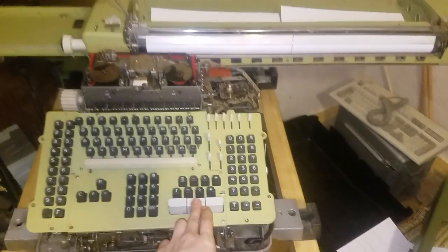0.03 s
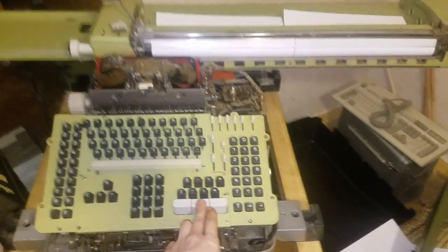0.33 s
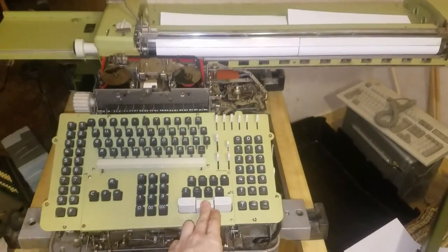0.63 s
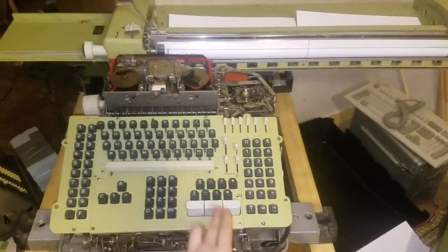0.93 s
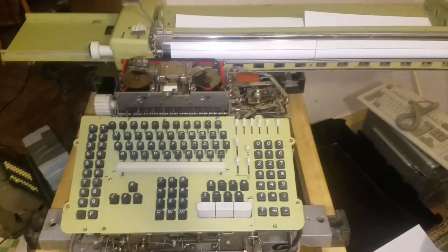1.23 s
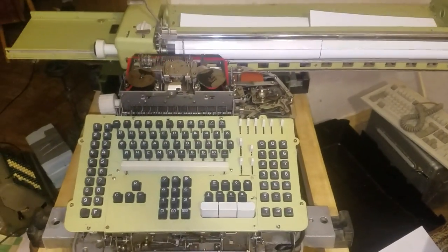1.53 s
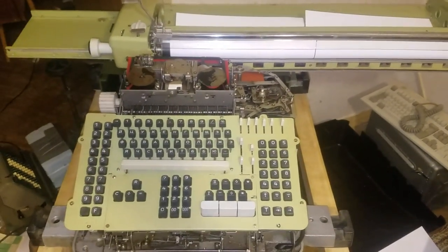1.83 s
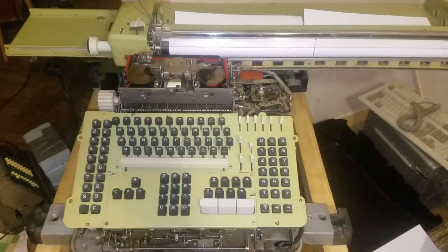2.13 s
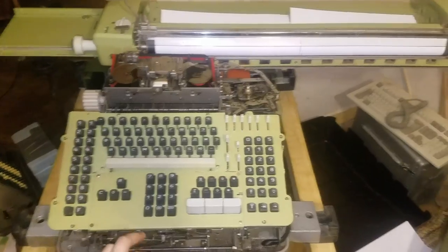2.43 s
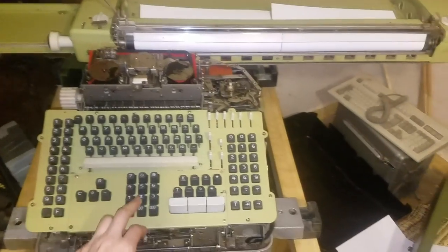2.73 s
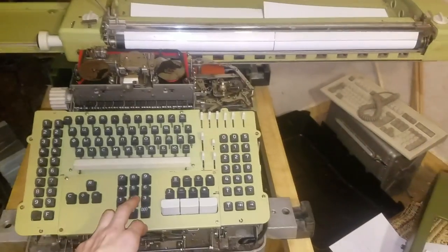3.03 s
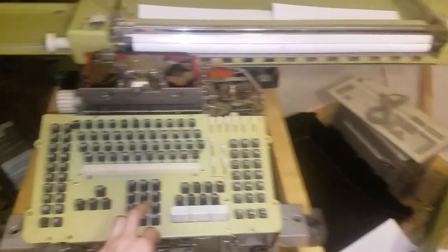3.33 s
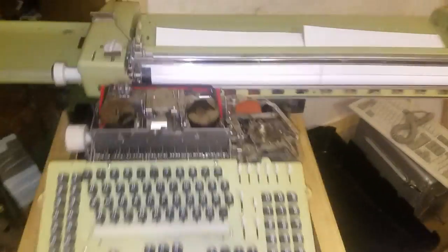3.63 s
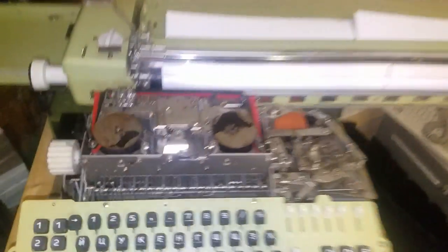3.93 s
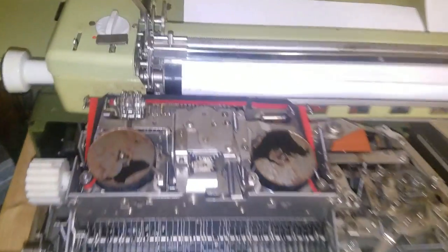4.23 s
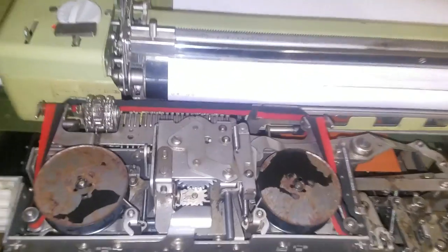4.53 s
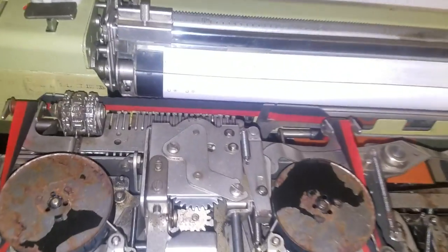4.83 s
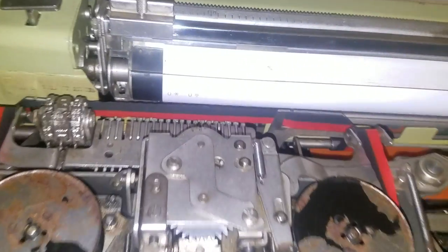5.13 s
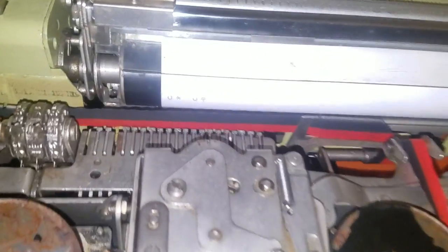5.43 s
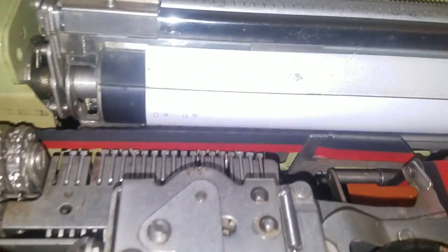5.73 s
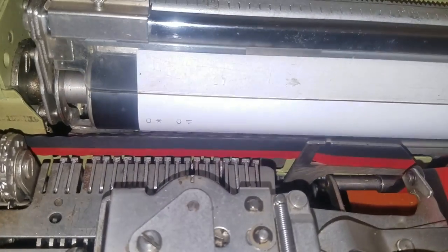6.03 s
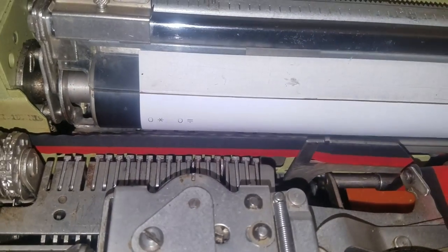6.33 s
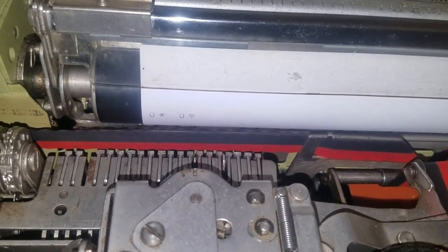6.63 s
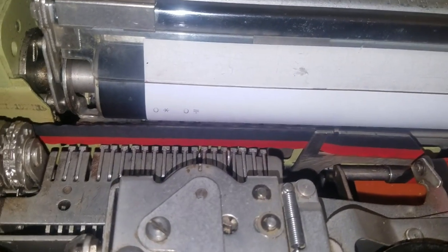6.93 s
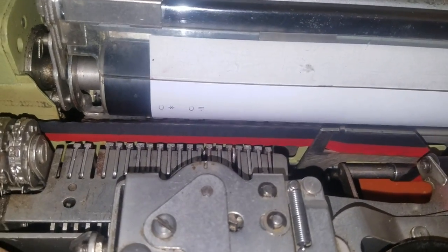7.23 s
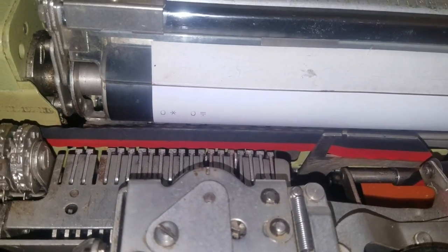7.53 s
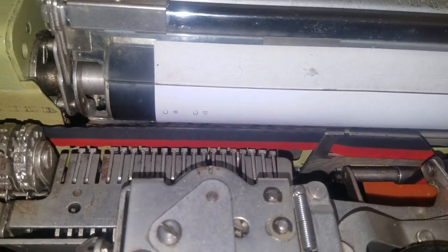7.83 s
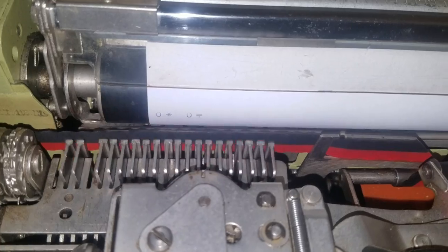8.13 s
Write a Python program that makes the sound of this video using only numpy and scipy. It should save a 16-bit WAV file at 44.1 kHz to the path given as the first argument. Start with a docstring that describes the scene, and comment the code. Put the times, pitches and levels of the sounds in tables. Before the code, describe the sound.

An old mechanical calculating machine clatters through a cycle, whirs down with slowing ticks, then keys click and it starts clattering again.

```python
"""Motor-driven accounting machine

An old machine is heard from close above in a small, quiet room. A key trips the clutch: racks, levers
and type bars collide through a cycle of strokes, ringing as steel and exciting the modes of the frame.
Friction then brings the drive to rest, its whine falling and a pawl ticking ever slower.
A few keys click, and a new cycle begins."""
import sys
import numpy as np
from scipy import signal
from scipy.fft import rfft, irfft, next_fast_len
from scipy.io import wavfile

SR = 44100
rng = np.random.default_rng(int(sys.argv[2]) if len(sys.argv) > 2 else 0)


def inscribe(sig):
    """Save sig as 16-bit PCM at rate SR to the path in sys.argv[1].

    A 1-D sig is mono; a 2-D sig holds one channel per row.
    Samples are clipped to [-1, 1] before scaling.
    """
    pcm = np.round(np.clip(np.atleast_2d(sig).T, -1, 1) * 32767)
    wavfile.write(sys.argv[1], SR, pcm.astype(np.int16))


N = 369116
TIME = np.arange(N) / SR

# Clutch engagements: t/s, duration/s
CYCLES = [(0.678, 1.35), (8.04, 0.4)]
# Travel of racks and levers: t/s, duration/s, relative level/dB of clatter, of springs, of frame
STROKES = [(0.673, 0.021, -24, -24, -45), (0.785, 0.065, -21.5, -27.5, -32.5),
           (0.959, 0.043, -19.5, -23, -40), (1.023, 0.018, -20.5, -23, -42.5),
           (1.052, 0.045, -21, -37.5, -43), (1.113, 0.048, -21.5, -37, -39), (1.212, 0.04, -20, -26, -38),
           (1.331, 0.14, -23, -43, -35), (1.426, 0.077, -20, -27.5, -29.5),
           (1.589, 0.2, -20.5, -25.5, -38.5), (1.839, 0.043, -21, -21, -32),
           (2.004, 0.15, -31.5, -32.5, -50.5), (2.165, 0.084, -26, -48, -33.5),
           (8.05, 0.019, -23.5, -36, -38), (8.138, 0.046, -20.5, -31, -40),
           (8.314, 0.055, -19.5, -20.5, -39.5)]
# Spectrum of struck steel: f/Hz, relative level/dB
STEEL_SPECTRUM = [(60, -23.5), (250, -11.5), (500, -1), (800, -3), (1300, -1.5), (2500, -0.5), (4000, -0.5),
                  (7000, -2), (10000, 2.5), (15500, -2.5)]
# Modes of the chassis and of the covers: f/Hz, bandwidth/Hz, relative level/dB
CHASSIS_MODES = [(50.1, 22, -20), (99.9, 22, -10.5), (131.2, 34, -5), (170, 26, -5.5), (202, 53, 4)]
COVER_MODES = [(245, 14, -4), (293, 28, -5), (321.7, 24, -0.5), (384, 45, -1), (550, 34, -12),
               (647, 120, -9.5), (807, 45, -4.5)]

# The cam shaft: full speed, deceleration, moment of rest
TOP_TURNS_PER_S, FRICTION_TURNS_PER_S2, REST_S = 4.4, 2.1135, 4.3566


def amp(db):
    """Amplitude ratio of a level in decibels."""
    return 10 ** (np.asarray(db) / 20)


def unit(x):
    """Normalisation to rms 1."""
    return x / np.sqrt(np.mean(x ** 2) + 1e-20)


def read(points, hz):
    """Interpolation along a logarithmic frequency axis."""
    f, value = np.transpose(points)
    return np.interp(np.log(hz + 1), np.log(f + 1), value)


def add(mix, s, sound):
    """Superposition of a sound on the mix at time s."""
    part = mix[:, round(s * SR):][:, :sound.shape[1]]
    part += sound[:, :part.shape[1]]


def noise(size=N):
    """White noise in two uncorrelated channels."""
    return rng.standard_normal((2, size))


def burst(start, length, db, rise_s, t60):
    """Envelope with a linear rise, a hold and an exponential decay."""
    t = TIME - start
    return np.clip(t / rise_s, 0, 1) * amp(db - 60 * np.clip((t - length) / t60, 0, 2))


def colour(x, spectrum, size=4096):
    """Minimum-phase filter of unit energy with the given spectrum."""
    log_gain = np.log(amp(read(spectrum, abs(np.fft.fftfreq(size, 1 / SR)))))
    taps = np.fft.ifft(np.exp(np.conj(signal.hilbert(log_gain)))).real[:size // 2]
    return signal.oaconvolve(x, taps[None] / np.linalg.norm(taps), axes=1)[:, :N]


def resonate(x, hz, width):
    """Response of a damped oscillator, scaled to rms 1."""
    return unit(signal.lfilter(*signal.iirpeak(min(hz, SR / 2 - 100), hz / width, fs=SR), x))


def ringing(x, hz, width, db):
    """One broad resonance stands out from a broadband excitation; unit energy per channel."""
    hit = unit(x) + amp(db) * resonate(x, hz, width)
    return hit / np.linalg.norm(hit, axis=1, keepdims=True)


def impact(hz, t60, width, ring_db, size=3000):
    """Steel on steel: dense, fast-decaying modes merge into a crack, one group standing out."""
    return ringing(noise(size) * amp(-60 * np.arange(size) / SR / t60), hz, width, ring_db)


def rattle(per_s, spread_db, t60=0.017, ring_db=-4, groups=12):
    """Shot noise: loose parts are struck at random, each group ringing around its own pitch."""
    out, fade = np.zeros((2, N)), amp(-120 / (t60 * SR))
    for hz in np.geomspace(900, 14000, groups):
        at = rng.integers(0, N, round(per_s * N / SR / groups))
        force = amp(spread_db * np.minimum(rng.exponential(1, len(at)), 3))
        energy = signal.lfilter([1], [1, -fade], np.bincount(at, force ** 2, N) + 1e-9)
        out += ringing(noise() * np.sqrt(energy), hz, hz / 4, ring_db)
    return unit(out)


def drumming(modes):
    """Random forcing: ceaseless small blows excite the modes of a large part."""
    return unit(sum(amp(db) * resonate(resonate(noise(), hz, width), hz, hz / 2)
                    for hz, width, db in modes))


def room_tone(level_db=-55):
    """Ambient noise: a steady, low rumble."""
    spectrum = [(20, -14.5), (48, -6), (75, -11.5), (130, 2.5), (190, -4), (250, -1.5), (295, 7), (340, -5),
                (410, -2.5), (520, -9.5), (1000, -18.5), (2000, -23), (4000, -31.5), (15000, -41)]  # background noise: f/Hz, relative level/dB
    return amp(level_db) * colour(noise(), spectrum)


def room(x, wet_db, first_s=.004, wander_hz=13, places=3):
    """Reverberation: sparse reflections, the top treble dying first, differ from place to place."""
    decay_times = [(150, 0.24), (1000, 0.12), (6000, 0.17), (15000, 0.073)]  # reverberation time: f/Hz, T60/s
    out = x
    for place in range(places):
        taps = noise(SR // 2) * (rng.random((2, SR // 2)) < .1) * (TIME[:SR // 2] > first_s)
        hz, t, bands = signal.stft(taps, SR, nperseg=256)
        tail = signal.istft(bands * amp(-60 * t / read(decay_times, hz)[:, None]), SR, nperseg=256)[1]
        tail /= np.linalg.norm(tail, axis=1, keepdims=True)
        share = np.sqrt(2 / places) * np.cos(np.pi * (wander_hz * TIME + place / places))
        out = out + amp(wet_db) * signal.oaconvolve(x * share, tail, axes=1)[:, :N]
    return out


def thumps(t60=0.097):
    """Damped oscillations: soft, low handling knocks, and the frame thudding as the machine restarts."""
    thuds = [(4.734, -51.5, 150), (4.91, -47, 124), (5.199, -50, 75.6), (5.498, -53, 85.5),
             (6.63, -41, 130), (8.165, -39, 85.5)]  # t/s, level/dB, f/Hz
    out, t = np.zeros((2, N)), np.arange(8000) / SR
    for s, db, hz in thuds:
        add(out, s, amp(db - 60 * t / t60) * np.sin(2 * np.pi * hz * t)[None])
    return out


def fingertip(start_s=0.22, length_s=0.11, level_db=-73, hz=4300):
    """Friction noise: a fingertip rubs faintly on the motor bar before pressing it."""
    friction = resonate(resonate(noise(), hz, 900), hz, 900)
    return friction * burst(start_s, length_s, level_db, rise_s=0.059, t60=.2)


def shaft_speed(spin_up_s=0.2):
    """Speed as a share of full: each cycle spins the shaft up; constant friction slows it between."""
    first, second = (np.clip((TIME - start) / spin_up_s, 0, 1) for start, _ in CYCLES)
    coast = np.clip((REST_S - TIME) * FRICTION_TURNS_PER_S2 / TOP_TURNS_PER_S, 0, 1)
    return first * coast + second


def bearing_squeal(hz=15030):
    """Dry friction briefly excites a high, narrow resonance of a bearing."""
    chirps = [(2.0, 0.015, -37.5), (2.05, 0.02, -37), (2.155, 0.015, -44)]  # t/s, duration/s, level/dB
    envelope = sum(burst(s, length, db, rise_s=.01, t60=.15) for s, length, db in chirps)
    return resonate(resonate(noise(), hz, 160), hz, 350) * envelope


def bearing_hiss(speed, level_db=-39.5, stall_speed=.09, flutter=.3, gear_ratio=19.75):
    """Amplitude modulation: bearing noise swells once per motor turn and stops at a crawl."""
    spectrum = [(2000, -26), (8000, -14.5), (11000, -1), (13000, 4), (15500, 0.5)]  # bearing noise: f/Hz, relative level/dB
    shaft_turns = np.cumsum(speed) * TOP_TURNS_PER_S / SR
    turns_to_rest = np.interp(REST_S, TIME, shaft_turns) - shaft_turns
    pulses = 1 - flutter * np.cos(2 * np.pi * gear_ratio * turns_to_rest)
    stall = speed ** 2 / (speed ** 2 + stall_speed ** 2)
    return amp(level_db) * speed ** .6 * stall * pulses * colour(noise(), spectrum)


def gear_whine(speed, teeth_per_turn=968, slow_gear_ratio=2.95, slow_gear_db=-18):
    """Two gears sound their meshing frequencies, proportional to speed; backlash breaks up the tones."""
    casing = [(1000, -32.5), (2200, -14.5), (2750, -16), (3000, -9), (3250, -17), (3530, -8.5), (3800, -13),
              (4200, -21.5)]  # resonances that the fast gear's tone passes: f/Hz, gain/dB
    mesh_hz = speed * TOP_TURNS_PER_S * teeth_per_turn
    phase = 2 * np.pi * np.cumsum(mesh_hz) / SR
    jitter = unit(signal.sosfilt(signal.butter(2, 30, fs=SR, output="sos"), noise()))
    backlash = unit(.6 + jitter)
    fast = amp(read(casing, mesh_hz)) * unit(backlash * np.cos(phase))
    slow = amp(slow_gear_db) * unit(backlash[::-1] * np.cos(phase / slow_gear_ratio))
    return fast + slow


def drive(speed, whir_db=-41.5, whine_db=-41, chassis_db=-55, covers_db=-47):
    """Tooth impacts merge into a whir, and covers and chassis drum; each follows a power law of speed."""
    spectrum = [(60, -13.5), (150, -9), (380, 2.5), (500, -7), (850, -2), (1100, -3), (1600, 2), (2400, 1),
                (3100, 3), (3500, 4.5), (4200, -1.5), (6500, 0), (9000, 4.5), (15500, -19.5)]  # gear noise: f/Hz, relative level/dB
    whir = amp(whir_db) * colour(rattle(per_s=2500, spread_db=-2), spectrum)
    covers = amp(covers_db) * drumming(COVER_MODES)
    rumble = amp(chassis_db) * drumming(CHASSIS_MODES)
    whine = amp(whine_db) * gear_whine(speed)
    return speed ** 1.075 * (whir + whine + covers) + speed ** .25 * rumble


def pawl(gain_db=11, rebound_s=0.0058, last_turns=5):
    """Uniform deceleration spaces out the ticks as a pawl drops off each cam lobe and bounces once."""
    lobe_places = [0.032, 0.436, 0.577, 0.8835]  # angle before rest/turns
    drops = [(-16, 6740, -7.5), (-19.5, 6700, -7.5), (-17, 5450, -14), (-17.5, 7800, -8)]  # one per lobe: relative level/dB, ring f/Hz, rebound gain/dB
    spectrum = [(600, -34.5), (1500, -2), (3000, -5.5), (4400, -8), (5250, 2), (6000, -5), (7000, -2),
                (9000, 6), (12000, -6.5), (15500, 2.5)]  # tick: f/Hz, relative level/dB
    out = np.zeros((2, N))
    for turn in range(last_turns):
        for place, (db, hz, rebound_db) in zip(lobe_places, drops):
            s = REST_S - np.sqrt(2 * (turn + place) / FRICTION_TURNS_PER_S2)
            for delay, drop_db in (0, 0), (rebound_s, rebound_db):
                tick = impact(hz, t60=0.014, width=800, ring_db=-12)
                add(out, s + delay, amp(db + gain_db + drop_db) * tick)
    return colour(out, spectrum)


def keys(gain_db=11, jingle_db=-36, jingle_t60=.11, snap_periods=15):
    """Keys and latches snap and their springs jingle; smaller parts decay faster and radiate no bass."""
    # t/s, relative level/dB, ring f/Hz, ring gain/dB, tilt/(dB per octave), lowest f/Hz of the part
    clicks = [(0.657, -38, 1740, -19, 0, 790), (0.669, -25, 2900, -11, 0, 880),
              (4.459, -45.5, 4670, -17, 2.5, 1510), (4.9162, -43.5, 7040, -6, 0.5, 1205),
              (5.177, -49.5, 6400, -11, -1, 1193), (6.095, -42, 6970, -8, 4, 700),
              (6.1, -30, 6600, -3, 4, 600), (6.1084, -33, 6830, -21, -0.5, 500),
              (6.176, -46, 2500, -12, -3, 700), (6.416, -39, 2300, -1, 5, 1400),
              (6.436, -29, 3530, -18, 10, 696), (6.4416, -20.5, 1200, -17, 2, 620),
              (6.537, -29, 2300, -16, 2, 1600), (6.5814, -20.5, 2240, -15, 0.5, 695),
              (6.5982, -22, 3160, -13.5, 0, 600), (6.616, -23, 6760, -20, 1.5, 700),
              (6.632, -28, 2800, -11, -0.5, 600), (7.4147, -27.5, 3300, 8, 1, 1450),
              (7.681, -39.5, 2090, -13, -0.5, 1400), (7.804, -46.5, 3310, 4, -1, 1383),
              (8.0018, -37, 4240, 1, -3, 1190), (8.027, -24, 2770, -6, -1, 880)]
    spectrum = [(100, -33.5), (500, 1.5), (1200, -0.5), (2500, -1.5), (4000, -4), (7000, -5), (10000, -4.5),
                (15500, -11.5)]  # snap: f/Hz, relative level/dB
    out, t = np.zeros((2, N)), np.arange(8000) / SR
    for s, db, hz, ring_db, tilt, low_hz in clicks:
        envelope = amp(-60 * t * low_hz / snap_periods) + amp(jingle_db - 60 * t / jingle_t60)
        tilted = [(f, level + tilt * np.log2(f / 3000)) for f, level in spectrum]
        snap = colour(noise(len(t)) * envelope, tilted)
        snap = signal.sosfilt(signal.butter(2, low_hz, "high", fs=SR, output="sos"), snap)
        add(out, s, amp(db + gain_db) * ringing(snap, hz, 400, ring_db))
    return out


def frame(chassis_db=-11, covers_db=0.5, idle_chassis_db=-45, idle_covers_db=-46, press_chassis_db=-1):
    """Forced vibration: the turning shaft, the strokes and firm keys shake chassis and covers."""
    firm_keys = [(6.076, 0.04, -50.5), (6.437, 0.045, -55), (6.581, 0.068, -50)]  # t/s, duration/s, level/dB
    rise_s, t60 = 0.05, 0.24  # the heavy frame is slow to start and to stop
    engaged = sum(burst(s, length, 0, rise_s, t60) for s, length in CYCLES)
    turning = sum(burst(s, length, 0, rise_s=0.1, t60=t60) for s, length in CYCLES)
    strokes = np.sqrt(sum(burst(s, length, db, rise_s, t60) ** 2 for s, length, _, _, db in STROKES))
    presses = sum(burst(s, length, db, rise_s, t60) for s, length, db in firm_keys)
    heave = np.hypot(amp(idle_chassis_db) * turning, amp(chassis_db) * strokes)
    heave += amp(press_chassis_db) * presses
    shiver = np.hypot(amp(idle_covers_db) * engaged, amp(covers_db) * strokes) + presses
    return heave * drumming(CHASSIS_MODES) + shiver * drumming(COVER_MODES)


def linkage(loose_parts, gain_db=-4, idle_levers_db=-32, idle_springs_db=-45, rise_s=0.013, t60=0.28):
    """Incoherent powers add: levers and springs rattle lightly with the clutch in, hard on each stroke."""
    spring_spectrum = [(2000, -28.5), (6000, -7.5), (9000, -3.5), (13000, 3.5), (15500, 4)]  # light springs: f/Hz, relative level/dB
    engaged = sum(burst(s, length, 0, rise_s, t60) for s, length in CYCLES)
    lever_power = (amp(idle_levers_db) * engaged) ** 2
    spring_power = (amp(idle_springs_db) * engaged) ** 2
    for s, length, lever_db, spring_db, _ in STROKES:
        lever_power += burst(s, length, lever_db, rise_s, t60) ** 2
        spring_power += burst(s, length, spring_db, rise_s, t60) ** 2
    levers = colour(loose_parts * np.sqrt(lever_power), STEEL_SPECTRUM)
    springs = colour(loose_parts[::-1] * np.sqrt(spring_power), spring_spectrum)
    return amp(gain_db) * (levers + springs)


def blows(loose_parts, crack_db=8, crack_t60=.014, rattle_db=-22, rattle_t60=0.22):
    """Impulsive excitation: clutch, racks and type bars strike with a crack and set loose parts rattling."""
    strikes = [(0.678, -4.5, 2660), (0.806, -13.5, 7020), (0.916, -10.5, 6500), (1.029, -10, 1780),
               (1.063, -6.5, 2600), (1.225, -9.5, 1740), (1.476, -13, 6580), (1.55, -9.5, 7000),
               (1.606, -15, 1530), (1.664, -11, 6300), (1.7, -6.5, 3330), (1.737, -10, 7060),
               (1.797, -12.5, 6600), (1.858, -12.5, 1590), (2.211, -16, 2920), (2.239, -10, 1470),
               (8.041, -3.5, 2860), (8.069, -13, 1680), (8.138, -5, 6870), (8.214, -10, 6900),
               (8.244, -12.5, 7000), (8.271, -11, 7150), (8.323, -16, 6860), (8.364, -8.5, 6880)]  # t/s, relative level/dB, ring f/Hz
    cracks, shake = np.zeros((2, N)), np.zeros((1, N))
    t = np.arange(SR // 3) / SR
    for s, db, hz in strikes:
        add(cracks, s, amp(db + crack_db) * impact(hz, crack_t60, width=580, ring_db=0))
        add(shake, s, amp(db + rattle_db - 60 * t / rattle_t60)[None])
    rattling = shake * np.roll(loose_parts, SR, axis=1)  # shifted to be uncorrelated with the linkage
    return colour(cracks + rattling, STEEL_SPECTRUM)


def scene():
    """Superposition of the machine, its reflections and the background."""
    # The microphone moves in until the machine lies more to its left: t/s, left minus right level/dB
    lean = [(0, 1), (3.5, -1), (6, 2.5)]
    loose_parts, speed = rattle(per_s=1300, spread_db=1), shaft_speed()
    works = linkage(loose_parts) + frame() + blows(loose_parts)
    works += drive(speed) + bearing_squeal() + bearing_hiss(speed) + fingertip()
    machine = room(works, wet_db=-8) + room(keys(), wet_db=-7) + room(pawl(), wet_db=-6)
    lean_db = np.interp(TIME, *np.transpose(lean))
    return machine * amp([lean_db / 2, -lean_db / 2]) + thumps() + room_tone()


def record(dry, self_noise_db=-75, clip_level=.9, cutoff_hz=15900):
    """Partial coherence: two microphone ports share much of the bass; each colours the treble its way."""
    # Port responses; the left faces the machine and resonates lower: f/Hz, gain/dB
    left_response = [(60, 7.5), (200, 1.5), (500, 6.5), (1300, 8), (4000, 6), (5600, 8), (6500, 13),
                     (7100, 12), (8000, -2), (10000, -10), (12000, -1.5), (15500, -6.5)]
    right_response = [(60, 4.5), (200, -3.5), (500, -4), (1300, -3.5), (4000, -2), (7000, -0.5),
                      (9500, -5.5), (12000, -2), (15000, 6)]
    coherence = [(60, 0.25), (150, 0.9), (330, 0.56), (700, 0.38), (1300, 0.29), (2400, .2), (4400, .02)]  # between the ports: f/Hz, coherence/1
    size = next_fast_len(N + SR, True)
    a, b = rfft(dry, size, axis=1)
    hz = np.fft.rfftfreq(size, 1 / SR)
    shared = read(coherence, hz)
    left = a * amp(read(left_response, hz))
    right = (shared * a + np.sqrt(1 - shared ** 2) * b) * amp(read(right_response, hz))
    ports = irfft([left, right], size, axis=1)[:, :N] + amp(self_noise_db) * noise()
    low_pass = signal.firwin(511, cutoff_hz, window=("kaiser", 9), fs=SR)
    return signal.oaconvolve(np.clip(ports, -clip_level, clip_level), low_pass[None], "same")


dry = scene()
out = record(dry)
inscribe(out)
```